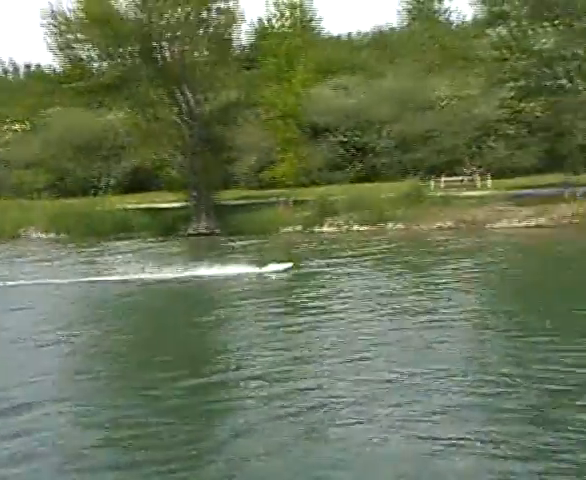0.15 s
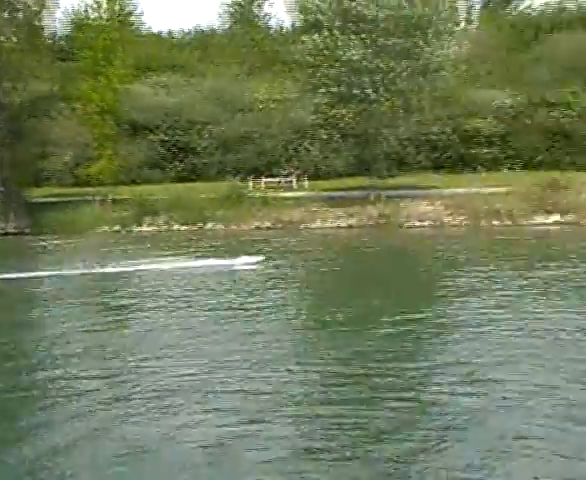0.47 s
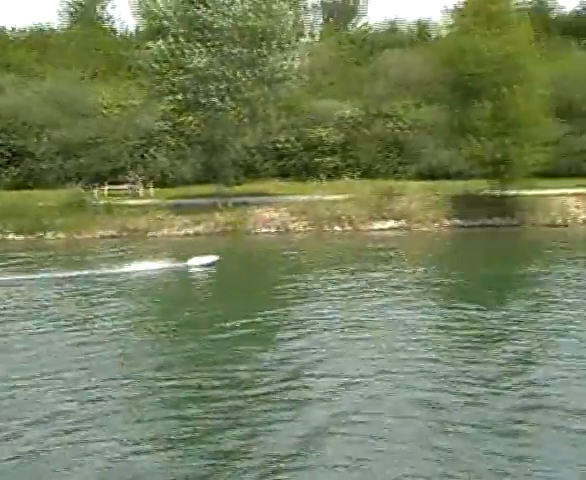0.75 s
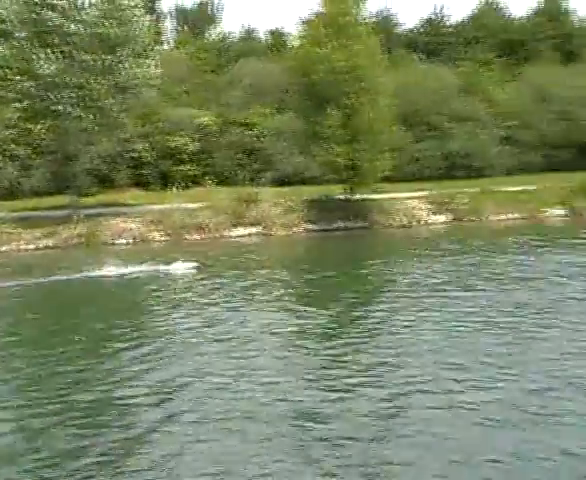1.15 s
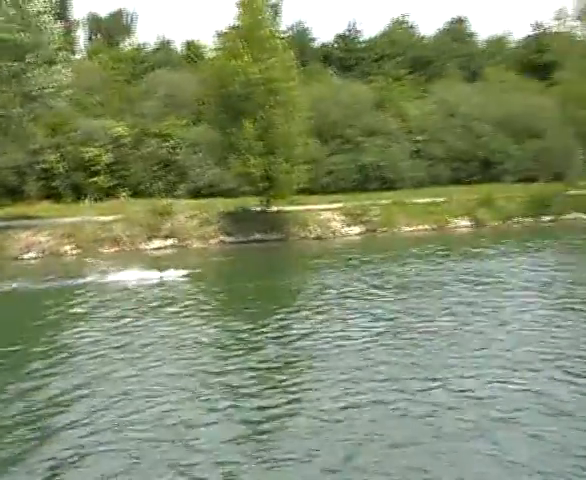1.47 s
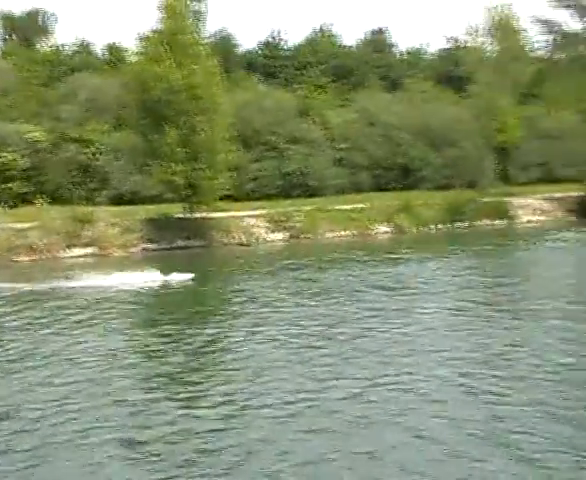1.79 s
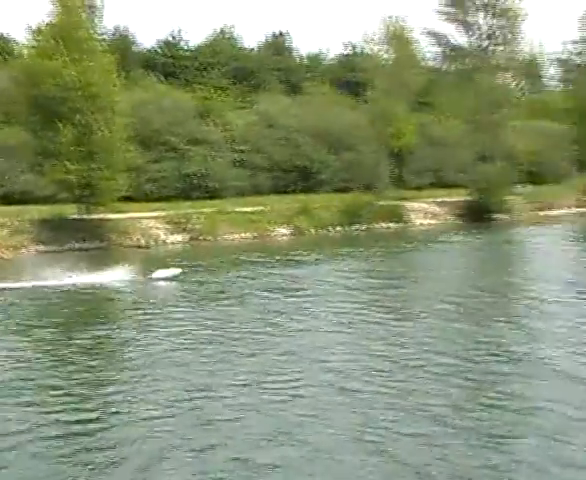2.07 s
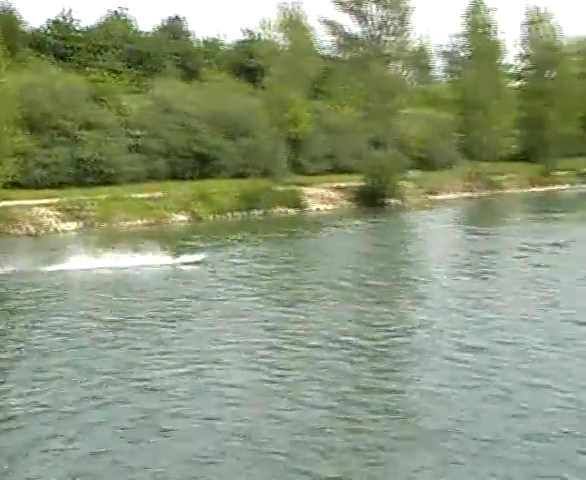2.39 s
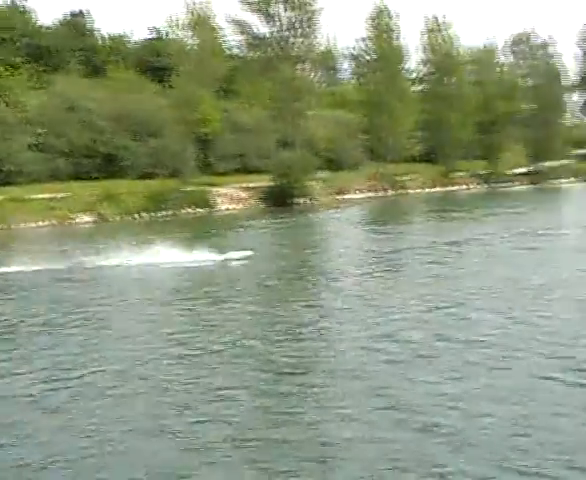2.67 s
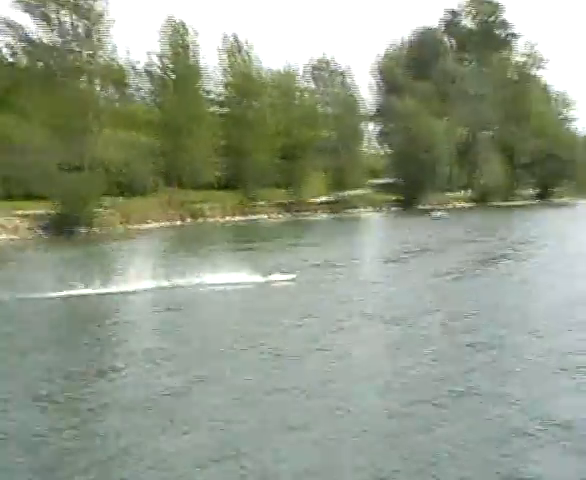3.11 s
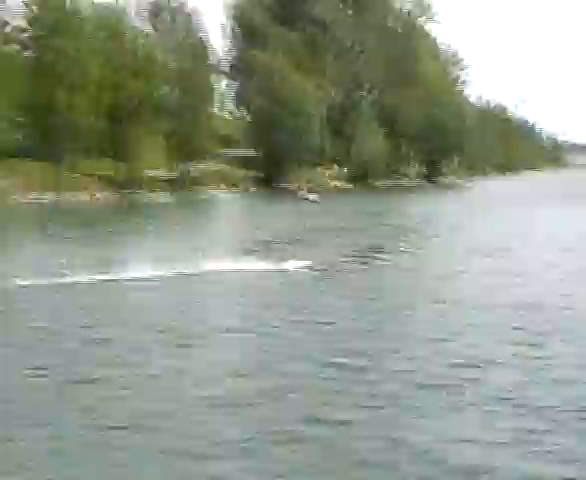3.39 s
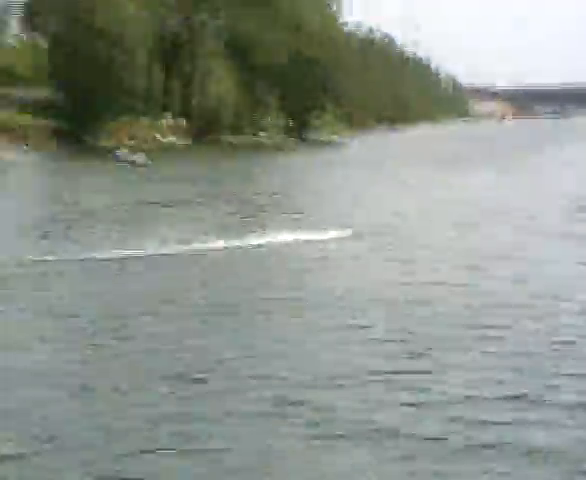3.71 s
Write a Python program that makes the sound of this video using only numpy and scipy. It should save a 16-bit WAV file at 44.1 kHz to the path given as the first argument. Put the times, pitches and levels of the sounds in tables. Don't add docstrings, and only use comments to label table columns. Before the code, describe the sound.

Small electric boat buzzes past, goes quiet with watery slaps, then screams back with wavering pitch

```python
import sys
import numpy as np
from scipy import signal
from scipy.fft import rfft, irfft, next_fast_len
from scipy.io import wavfile
from scipy.ndimage import uniform_filter1d, map_coordinates

SR = 44100
rng = np.random.default_rng(int(sys.argv[2]) if len(sys.argv) > 2 else 0)


def digitize_waveform(pressure):
    field = np.atleast_2d(pressure).T
    bounded = np.clip(field, -1, 1)
    quanta = np.round(bounded * 32767).astype(np.int16)
    wavfile.write(sys.argv[1], SR, quanta)


def ratio(d):
    e = np.asarray(d, float) / 20
    return 10 ** e


N = 169785

# [t/s, blade rate f/Hz, whine level/dB, spray level/dB]
CRUISE_RUN = [
    (0, 700, -25.5, -33.5),
    (0.059, 677, -24, -36.5),
    (0.179, 686.7, -20.5, -36.5),
    (.29, 660, -20.5, -35.5),
    (.395, 706, -17.5, -35.5),
    (0.418, 683.5, -15.5, -36),
    (0.461, 716, -18, -29.5),
    (.515, 632.7, -21, -38.5),
    (.56, 580.7, -47, -36.5),
    (.6, 567, -53, -38),
]
# [t/s, spray level/dB]
COAST_WASH = [
    (0.6, -39),
    (0.7, -38.5),
    (.9, -40.5),
    (.97, -46.5),
    (1.05, -46.5),
    (1.2, -43.5),
    (1.329, -46),
    (1.465, -43),
    (1.55, -43),
]
# [t/s, blade rate f/Hz, whine level/dB, spray level/dB]
PICKUP_RUN = [
    (1.559, 520, -46, -40.5),
    (1.703, 600, -32, -37.5),
    (1.791, 620, -28.5, -38.5),
    (1.9, 650, -23.5, -39.5),
    (1.998, 705, -26.5, -37.5),
    (2.05, 800, -23, -37.5),
    (2.108, 780, -17.5, -35),
    (2.18, 730, -19.5, -37),
    (2.274, 870, -20.5, -33.5),
]
# [t/s, blade rate f/Hz]
FULL_SPEED_RATE = [(2.293, 1098), (2.351, 1244), (2.372, 1109), (2.41, 1011), (2.445, 909), (2.469, 923),
                   (2.499, 891), (2.579, 903), (2.605, 1010), (2.63, 1132), (2.678, 1333), (2.692, 1211),
                   (2.735, 1092), (2.794, 992.5), (2.889, 905), (2.93, 953.6), (2.965, 1110), (3.02, 1148),
             (3.06, 1001), (3.12, 883.5), (3.19, 1032), (3.245, 1140), (3.28, 1066), (3.31, 923.6),
             (3.365, 960), (3.405, 855), (3.475, 833.6), (3.521, 935), (3.575, 791.6), (3.629, 734.7),
             (3.72, 688.5), (3.798, 728.6), (3.849, 702)]
# [t/s, whine level/dB, spray level/dB]
RACE_LEVELS = [(2.31, -15.5, -29), (2.51, -22, -32.5), (2.62, -23, -29.5), (2.76, -20, -29),
               (2.89, -19.5, -33.5), (3.008, -19, -31.5), (3.128, -18.5, -34), (3.27, -18.5, -34.5),
               (3.41, -20, -34), (3.58, -23, -31), (3.74, -26, -33.5), (3.849, -24.5, -32.5)]
# [t/s, length/s, drop/dB]
LEAPS_CLEAR = [(2.28, 0.066, 22), (2.35, 0.024, 10.5), (2.366, 0.0047, 10), (2.6052, 0.018, 14),
               (2.6397, 0.043, 18), (2.694, 0.0037, 17), (2.703, 0.02, 20), (2.761, 0.011, 11.5),
               (2.9464, 0.0093, 5), (2.967, 0.021, 15.5), (3.0026, 0.02, 9), (3.119, 0.012, 3),
               (3.299, 0.0032, 27), (3.484, .0125, 11), (3.52, 0.0052, 21), (3.78, 0.016, 11)]
# [t/s, length/s, level/dB]
SHAFT_SPIN = [
    (2.309, 0.044, -24.5),
    (2.617, 0.088, -25),
]
# [t/s, gain/dB, fade/s]
DEEP_BITES = [(0.183, 7.5, .018), (0.263, 0.5, .01), (0.299, -6, .01), (.345, 3.5, .025), (.424, 2.5, .015),
              (0.52, 5.5, .006), (0.58, 11, .005), (1.709, 3, .012), (1.835, 6, .014), (1.889, -1, .012),
              (2.035, 8.5, .02), (2.11, 2, .012), (2.221, 1, .012), (2.38, 4.5, .022), (2.459, 8, .01),
              (2.48, 5, .012), (2.582, 0, .008), (2.6, 13, .004), (2.687, 11.5, .006), (2.7, 2, .003),
              (2.73, 4.5, .006), (2.776, 5, .005), (2.802, 6, .01), (2.884, 4.5, .008), (2.908, 7, .006),
              (2.924, 7, .01), (2.966, 13.5, .004), (2.99, 1.5, .005), (3.037, 4.5, .012),
              (3.065, 2.5, .008), (3.096, 3, .006), (3.133, 2, .01), (3.19, 7, .018), (3.249, -2.5, .01),
              (3.274, 9.5, .011), (3.347, 5, .015), (3.374, 5.5, .015), (3.423, 7, .008),
              (3.457, 3.5, .008), (3.512, 11.5, .005), (3.558, 4, .01), (3.579, 2, .008), (3.622, 3, .008),
              (3.685, 3.5, .012), (3.806, 4.5, .015)]
# [t/s, overtone gain/dB, width/s]
TIP_SKIMS = [(.15, 6.5, 0.018), (1.85, 3, 0.068), (.46, -4, 0.018), (.53, 9, 0.024), (2.385, -1, 0.0096),
             (2.632, 11, 0.007), (2.697, -4.5, .006), (2.995, 10, 0.0087), (3.17, 2.5, 0.013),
             (3.25, 2.5, 0.015), (3.315, 6.5, 0.0067), (3.535, 4.5, 0.011), (3.575, 1.5, 0.0076),
             (3.815, 6.5, 0.012)]
# [multiple of blade rate, level/dB]
BLADE_ORDERS = [(1, 0), (2, -10), (3, -13), (4, -17), (5, -20), (6, -22), (7, -26), (8, -28)]
# [f/Hz, level/dB]
HULL_RADIATION = [(300, 0), (2500, 0), (3100, -6), (6000, -6), (11000, -9)]
# [f/Hz, level/dB per Hz]
SPRAY_COLOUR = [(250, -57), (480, -7.5), (900, -4), (1500, -10.5), (2400, -10), (3600, -18), (6600, -20.5),
                (10700, -32)]
# [t/s, strength level/dB, share of small eddies 0-1]
WIND_GUSTS = [(0, -38.5, 0.42), (.55, -36, 0.41), (.85, -28, 0.5), (.94, -33, 0.25), (1.0, -35.5, 0.28),
              (1.8, -36.5, 0.41), (2.13, -29, 0.22), (2.5, -33, 0.28), (2.8, -26.5, 0.82), (3.5, -28, 0.97),
              (3.85, -37, 0.76)]
# [f/Hz, level/dB per Hz]
LARGE_EDDIES = [(15, -65), (30, -25.5), (60, -6.5), (120, 2.5), (200, -1.5), (400, -18.5), (800, -51)]
# [f/Hz, level/dB per Hz]
SMALL_EDDIES = [(40, -67), (100, -8.5), (220, -2.5), (350, -4.5), (550, -14.5), (900, -40.5)]
# [t/s, peak level/dB, width/s, left over right/dB]
GUST_THUMPS = [(0.7566, -2.5, 0.0012, -4), (0.774, -26, 0.0039, -8), (0.822, -15, 0.00058, -3),
               (.834, -10, 0.0018, 0), (0.842, -4.5, 0.00096, -5), (.8545, -12, 0.0017, -10),
               (0.878, -21, .003, 3), (0.8956, -10.5, 0.0015, -5), (.912, -14.5, 0.0022, 0),
               (0.939, -20.5, .0016, 0), (2.092, -30, 0.0021, 8), (2.267, -12.5, 0.0019, -3)]
# [t/s, level/dB, length/s]
HULL_SLAPS = [
    (.521, -27, 0.034),
    (.6955, -33.5, 0.016),
    (.753, -28.5, 0.01),
    (.765, -28, 0.032),
    (.921, -48, 0.028),
    (1.0145, -32, 0.0072),
    (1.07, -31, 0.055),
    (1.2525, -31, 0.011),
    (1.377, -32.5, 0.023),
    (1.701, -30.5, 0.032),
]
# [t/s, level/dB, length/s]
BLADE_SPITS = [
    (2.268, -20.5, 0.0061),
    (2.345, -17, 0.0027),
    (2.36, -47, 0.0028),
    (2.462, -24, 0.017),
    (2.628, -20.5, 0.013),
    (2.686, -24, 0.012),
    (2.96, -25.5, 0.011),
    (3.22, -23.5, 0.048),
    (3.36, -27.5, 0.019),
]
# [f/Hz, level/dB per Hz]
SPLASH_COLOUR = [(300, -43), (600, 6), (2000, 0.5), (4200, -5), (10700, -14)]


def unit(x):
    return x / np.sqrt(np.mean(x ** 2) + 1e-20)


def curve(s, v):
    return np.interp(np.arange(N) / SR, s, v)


def wobble(rate):
    return map_coordinates(rng.standard_normal(N // 100), [np.arange(N) * min(rate, 420) / SR])


def coloured(x, points):
    m = next_fast_len(N + 8192)
    f, db = np.transpose(points)
    gain_db = np.interp(np.log(np.fft.rfftfreq(m, 1 / SR) + 1), np.log(f + 1), db)
    return irfft(rfft(x, m) * ratio(gain_db), m)[..., :N]


def window(s, length, edge):
    t = np.arange(N) / SR
    return np.clip(np.minimum(t - s, s + length - t) / edge + 0.5, 0, 1)


def patchy(x):
    z = signal.stft(x, nperseg=256)[2]
    field = uniform_filter1d(rng.standard_normal(z.shape), size=8, axis=0)
    field = uniform_filter1d(field, size=6, axis=1)
    return signal.istft(z * ratio(2.5 * unit(field)), nperseg=256)[1][:N]


def controls():
    cruise, coast, pickup = np.array(CRUISE_RUN), np.array(COAST_WASH)[1:-1], np.array(PICKUP_RUN)
    race, load = np.array(FULL_SPEED_RATE), np.array(RACE_LEVELS)
    rate = curve([*cruise[:, 0], *pickup[:, 0], *race[:, 0]], [*cruise[:, 1], *pickup[:, 1], *race[:, 1]])
    rate = uniform_filter1d(rate, size=400)
    shaft = np.pi * np.cumsum(rate) / SR
    whine_db = curve([*cruise[:, 0], 0.67, 1.46, *pickup[:, 0], *load[:, 0]],
                     [*cruise[:, 2], -65, -65, *pickup[:, 2], *load[:, 1]])
    spray_db = curve([*cruise[:, 0], *coast[:, 0], *pickup[:, 0], *load[:, 0]],
                     [*cruise[:, 3], *coast[:, 1], *pickup[:, 3], *load[:, 2]])
    air_db = sum(db * window(s, length, 0.004) for s, length, db in LEAPS_CLEAR)
    return rate, shaft, whine_db - air_db, spray_db - 0.61 * air_db


def bites():
    t = np.arange(N) / SR
    rise = 0.33
    deep_db = sum(db * np.exp(-0.5 * ((t - s) / np.where(t < s, rise * w, w)) ** 2) for s, db, w in DEEP_BITES)
    return deep_db - 0.08 * 1.16 * np.tanh(0.46 * wobble(29.25) + 0.74 * wobble(90))


def blade_whine(blade, edge_db):
    own_db = 5
    stack = ratio(-23.5 + own_db * np.minimum(wobble(45), 1.1)) * np.cos(blade / 2)
    for k, db in BLADE_ORDERS:
        if k == 1:
            level_db = db + own_db * np.minimum(wobble(120), 0.9)
        else:
            level_db = db + edge_db + own_db * np.minimum(wobble(85), 1.3)
        stack = stack + ratio(level_db) * np.cos(k * blade + 0.75 * k ** 0.4 * wobble(170) + k)
    return np.sqrt(2) * coloured(stack, HULL_RADIATION)


def blade_spray(blade):
    thrown = patchy(rng.standard_normal(N)) * (1 + 0.39 * np.cos(blade))
    return unit(coloured(thrown * ratio(1.02 * wobble(300)), SPRAY_COLOUR))


def boat():
    rate, shaft, whine_db, spray_db = controls()
    jitter = 0.024 * wobble(110) + 0.008 * wobble(30)
    blade = 2 * shaft + 2 * np.pi * np.cumsum(rate * jitter) / SR
    bite_db = bites()
    t = np.arange(N) / SR
    skim_db = sum(db * np.exp(-0.5 * ((t - s) / w) ** 2) for s, db, w in TIP_SKIMS)
    edge_db = np.clip(0.6 * (spray_db - whine_db + 14.5), -1.5, 5) + skim_db
    whine = ratio(whine_db - 3.5 + bite_db) * blade_whine(blade, edge_db)
    spray = ratio(spray_db + 6.5 + 0.5 * bite_db + wobble(10)) * blade_spray(blade)
    airborne = sum(ratio(db) * window(s, length, 0.05) for s, length, db in SHAFT_SPIN)
    return whine + spray + airborne * np.sqrt(2) * np.cos(shaft)


def bank(x):
    t60, spread = 0.45, 0.63
    decay = ratio(-60 * np.arange(SR // 3) / SR / t60)
    mid, side = rng.standard_normal((2, SR // 3)) * decay
    tail = np.array([mid + spread * side, mid - spread * side])
    return signal.fftconvolve(x[None], tail / np.linalg.norm(tail[0]), axes=1)[:, :N]


def eddies(points):
    return unit(coloured(rng.standard_normal((2, N)), points))


def thumps():
    t = np.arange(N) / SR
    dips = np.zeros((2, N))
    for s, db, w, left_right_db in GUST_THUMPS:
        u = ((t - s) / w) ** 2
        gain = ratio([[db + left_right_db / 2], [db - left_right_db / 2]])
        dips += gain * (0.76 * u - 1) * np.exp(-0.5 * u)
    return dips


def wind():
    s, strength_db, small = np.transpose(WIND_GUSTS)
    turn = np.clip(curve(s, small), 0, 1) * np.pi / 2
    lumps = ratio(2 * np.array([wobble(15), wobble(16)]))
    a, b = (np.cos(turn) * eddies(LARGE_EDDIES) + np.sin(turn) * eddies(SMALL_EDDIES)) * lumps
    alike, port_hz = 0.5, 70
    opposed = 2 * coloured(a, [(port_hz, 0), (2 * port_hz, -30)]) - a
    pair = np.array([a, alike * opposed + np.sqrt(1 - alike ** 2) * b])
    return ratio(curve(s, strength_db) + 8.5) * pair + thumps()


def bursts(rows):
    return sum(ratio(db) * window(s, length, 0.4 * length) for s, db, length in rows)


def slaps():
    grains = patchy(rng.standard_normal(N)) * ratio(2.8 * wobble(340))
    grains = unit(coloured(grains, SPLASH_COLOUR))
    bright = unit(np.gradient(grains) + 0.12 * grains)
    return grains * bursts(HULL_SLAPS) + bright * bursts(BLADE_SPITS)


def scene():
    far = boat() + slaps()
    return far + ratio(-12) * bank(far) + wind()


def roll_off(x):
    return signal.sosfilt(signal.butter(12, 12010, fs=SR, output="sos"), x)


def record(dry):
    top_hz = 10750
    body = coloured(dry, [(top_hz - 150, 0), (top_hz + 150, -60)])
    treble = np.gradient(np.gradient(dry.mean(0))) ** 2
    swell = uniform_filter1d(treble, size=1500) / uniform_filter1d(treble, size=16000)
    swell = np.log(np.abs(swell) + 1e-9)
    opening = np.clip(3 * (0.45 * wobble(27) + 2.0 * swell - 0.35), 0, 1)
    sliver = coloured(dry * opening, [(11250, -85), (11400, -2.5), (11850, -16.5), (12050, -74)])
    mix = np.clip(body + ratio([[-7], [-5]]) * sliver, -0.97, 0.97)
    return roll_off(mix)


dry = scene()
out = record(dry)
digitize_waveform(out)
```